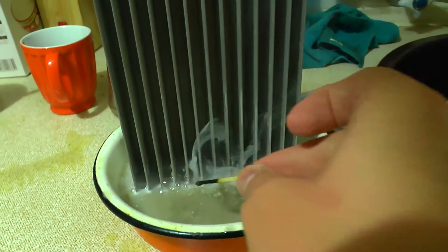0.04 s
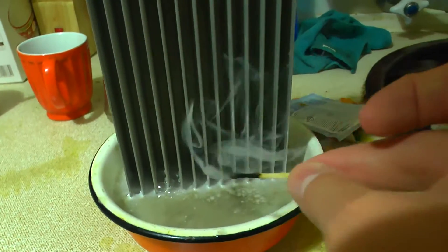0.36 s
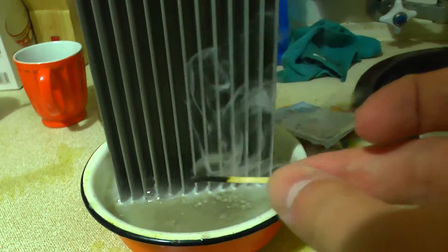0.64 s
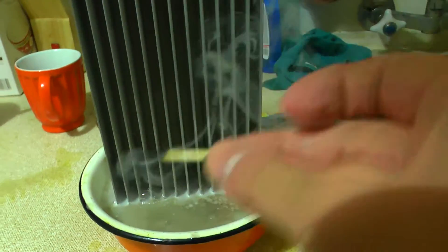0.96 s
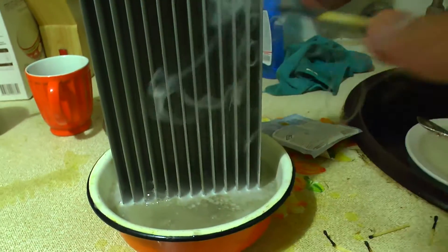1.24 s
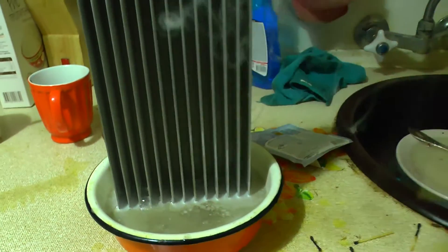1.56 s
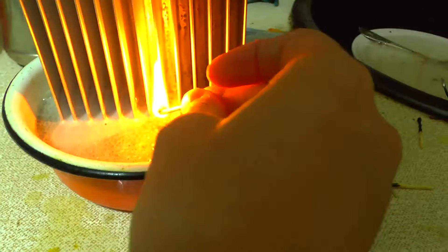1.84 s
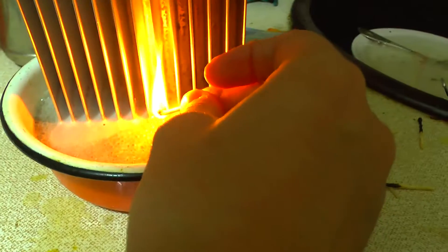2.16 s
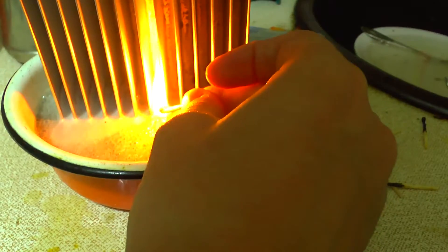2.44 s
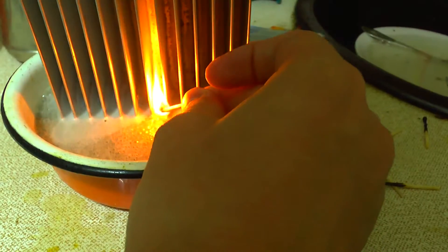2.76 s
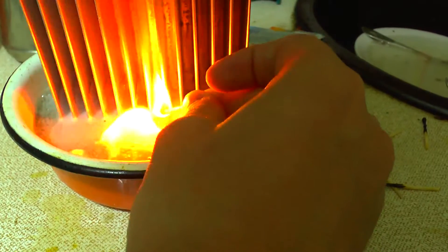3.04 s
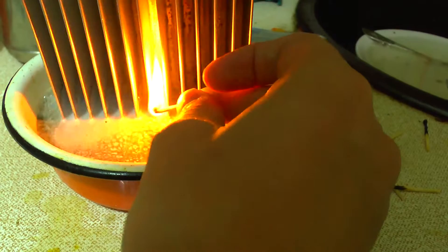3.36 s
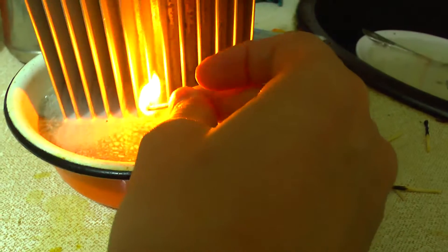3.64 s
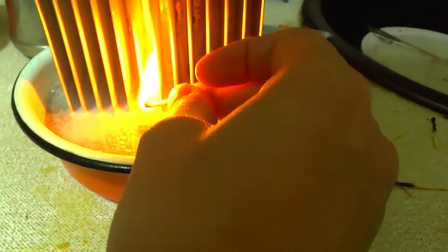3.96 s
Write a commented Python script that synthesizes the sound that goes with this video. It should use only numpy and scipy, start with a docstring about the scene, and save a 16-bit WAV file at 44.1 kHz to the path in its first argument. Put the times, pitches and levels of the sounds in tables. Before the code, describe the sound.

Liquid fizzes steadily in a bowl, then gas bubbles ignite with low pops and a whoosh.

```python
"""A fine, bright fizz comes first: tiny gas bubbles burst in liquid around a finned metal plate in an
enamel bowl, over a faint room hum. The scene then cuts to a later, coarser foam with a flame held to it.
Gas bubbles catch fire with low pops, and a patch of foam flares with a whoosh.
An automatic gain control turns everything down at these loud moments, and the fizz slowly comes back."""
import sys
import numpy as np
from scipy import signal
from scipy.fft import rfft, irfft
from scipy.io import wavfile
from scipy.ndimage import uniform_filter1d

SR = 44100
rng = np.random.default_rng(int(sys.argv[2]) if len(sys.argv) > 2 else 0)


def pcm_store(signal):
    """Save signal as 16-bit PCM."""
    levels = np.round(np.clip(np.atleast_2d(signal), -1, 1) * 32767)
    wavfile.write(sys.argv[1], SR, levels.astype(np.int16).T)


N = 176400  # 4 seconds

# Tone of the room's rumble before and after the cut: f/Hz, relative level/dB
EARLY_RUMBLE = [(20, -26), (45, -11.5), (100, 0), (150, -3), (220, 2), (310, 3.5), (350, -5), (420, -3),
                (520, -2), (650, -12.5), (1000, -18.5), (2000, -52)]
LATE_RUMBLE = [(20, 0.5), (35, 3), (50, -3), (110, 1), (160, 0.5), (230, -1), (290, -3), (480, -3),
               (700, -4.5), (1000, -3), (2000, -52)]
# Steady tones of a humming appliance: f/Hz, level/dB
EARLY_HUM = [(102.3, -74.5), (193.8, -66.5), (290.7, -64.5), (387.6, -62)]
LATE_HUM = [(64.6, -70.5), (193.8, -62.5)]
# Time the room's echo takes to fade by 60 dB: f/Hz, t/s
ECHO_FADE_TIMES = [(100, 0.65), (400, 0.41), (1500, 0.54), (8000, 0.23)]

# Tone of the fine and the coarse fizz: f/Hz, relative level/dB
FINE_TONE = [(410, -52), (700, -22), (862, -26), (907, -21), (1020, -25.5), (1240, -18.5), (1630, -23.5),
             (1760, -18.5), (2080, -17), (2280, -10), (2530, -9.5), (3190, -9.5), (4140, -9), (4540, -6.5),
             (5300, -8.5), (5650, -9), (7820, -5.5), (9140, -4.5), (9750, -5), (12300, -13.5), (15600, -24)]
COARSE_TONE = [(410, -32), (700, -21), (850, -22.5), (1020, -15.5), (1200, -4.5), (1650, -4.5),
               (2080, -6.5), (2250, -2.5), (2900, -3), (3700, -2), (4350, -.5), (4920, -3), (6300, -12),
               (8060, -22.5), (8900, -35.5), (10200, -36.5), (10800, -80), (14000, -77), (22000, -110)]
# Pitches that bowl and plate strengthen or weaken: f/Hz, width/Hz, boost/dB
FINE_RESONANCES = [(2140, 90, -2.5), (2557, 62, 3), (3230, 150, 1), (3620, 110, -2), (3820, 70, 2),
                   (4050, 50, 5), (4180, 130, -4.5), (4560, 200, 1.5), (5380, 110, 3.5), (5800, 130, -1.5),
                   (6030, 130, 1)]
COARSE_RESONANCES = [(1160, 33, 2), (1288, 46, 3), (1480, 60, 2.5), (1680, 32, 3), (1980, 50, 2),
                     (2090, 77, -0.5), (2270, 120, 2.5), (2520, 100, -2.5), (2680, 90, 1.5),
                     (2870, 100, -3), (3100, 90, 2), (3970, 84, 1.5), (4400, 110, 2), (4770, 130, 1)]
# Loudness of the fizz over time: t/s, level/dB
FINE_LOUDNESS = [(0.0, -36), (0.354, -36), (1.448, -37), (1.784, -37.5), (1.82, -38.5)]
COARSE_LOUDNESS = [(1.84, -35.5), (2.3, -35.5), (2.75, -34.6), (2.95, -35), (3.4, -34), (3.75, -35),
                   (4, -35.5)]
# How alike left and right are: f/Hz, likeness (0 = unrelated, 1 or more = the same)
FINE_LIKENESS = [(800, 0), (1250, 0.8), (1700, 0.57), (2600, 0.92), (3600, 0.83), (7000, 2), (10000, 0.75),
                 (15000, .5)]
COARSE_LIKENESS = [(800, 0.88), (1400, 0.92), (2800, 1), (4500, 0.99), (6500, 0.66), (9000, 0.1)]
FLAME_LIKENESS = [(100, 1), (600, 0.98), (1100, 0.88), (1800, 0.94), (2700, 1), (5000, 1), (8000, .6)]
# How far the fizz leans to the left: f/Hz, left minus right level/dB
FINE_LEAN = [(60, -1.5), (150, 0.0), (380, 0.0), (950, -0.61), (2380, 0.0), (5980, 0.0), (15000, 1.3)]
COARSE_LEAN = [(60, 0.0), (150, 0.0), (380, 0.5), (950, 2.5), (2380, 0.04), (5980, 3.1), (15000, 0.22)]

# Bubbles catching fire: t/s, level/dB, f/Hz, snap level relative to the pop/dB
BURNING_BUBBLES = [(2.1775, -13, 402, -12), (2.444, -32.5, 400, -15), (2.648, -40.5, 380, -15),
                   (2.731, -43, 560, -18), (2.826, -40.5, 480, -16), (2.9553, -8, 456, -15.5),
                   (3.0898, -6, 440, -19), (3.1246, -5, 444, -14), (3.2265, -14, 480, -24)]
# Course of the flare: t/s, roar level/dB, rush level/dB, middle of the rush f/Hz
FLARE_COURSE = [(2.955, -58, -62, 2500), (2.968, -23.5, -52, 2500), (2.985, -35, -51, 2500),
                (3.004, -23.5, -47, 2600), (3.016, -21.5, -30, 2650), (3.036, -17, -25, 2600),
                (3.066, -18, -28.5, 1900), (3.09, -15.5, -20.5, 1500), (3.113, -23.5, -39, 1500),
                (3.14, -26, -33, 1500), (3.178, -41.5, -43, 1400), (3.205, -24.5, -36.5, 1400),
                (3.23, -27, -32, 1300), (3.25, -50, -46, 1300), (3.3, -68, -83, 1300)]
# Tone of the swirling flame: f/Hz, relative level/dB
ROAR_TONE = [(20, -21), (50, -12), (75, -10), (130, -1), (210, -3), (300, -0.5), (480, 3), (700, -1.5),
             (1000, -9), (1600, -12.5), (3000, -16), (5500, -22.5), (8000, -41), (10000, -78), (12000, -85)]


def amp(db):
    """Turns decibels into a number to multiply a sound by."""
    return 10 ** (np.asarray(db) / 20)


def unit(x):
    """Scales a signal to an average strength (rms) of 1."""
    return x / np.sqrt(np.mean(x ** 2) + 1e-20)


def at_pitch(table, hz):
    """Looks up a table between its rows, on a logarithmic frequency scale."""
    f, value = np.transpose(table)
    return np.interp(np.log(hz + 1), np.log(f + 1), value)


def over_time(table):
    """Turns each value column of a time table into one value per sample."""
    times, *columns = np.transpose(table)
    return [np.interp(np.arange(N) / SR, times, column) for column in columns]


def frequencies():
    """Lists the frequencies in the spectrum of a full-length sound."""
    return np.fft.rfftfreq(N, 1 / SR)


def shape_stereo(pair, tone_db, likeness):
    """Blends two unrelated signals into stereo of strength 1, with this tone and left-right likeness."""
    middle, side = rfft(pair)
    likeness = np.clip(likeness, 0, 1)
    side = side * np.sqrt((1 - likeness) / (1 + likeness))
    return unit(irfft(np.array([middle + side, middle - side]) * amp(tone_db), N))


def room_hum(tone, rumble_db, hum_tones, likeness):
    """The room rumbles softly while an appliance hums on a few steady pitches."""
    t = np.arange(N) / SR
    hum = sum(amp(db) * np.sqrt(2) * np.sin(2 * np.pi * (hz * t + rng.random())) for hz, db in hum_tones)
    rumble = shape_stereo(rng.standard_normal((2, N)), at_pitch(tone, frequencies()), likeness)
    return amp(rumble_db) * rumble + hum


def room_echo(sound, likeness):
    """Sound bounces around a small kitchen, and each pitch dies away at its own speed."""
    middle, side = rng.standard_normal((2, SR // 2))
    side = side * np.sqrt((1 - likeness) / 2)
    hz, t, bands = signal.stft([middle + side, middle - side], SR, nperseg=256)
    fading = amp(-60 * t / at_pitch(ECHO_FADE_TIMES, hz)[:, None])
    tail = signal.istft(bands * fading, SR, nperseg=256)[1]
    tail *= np.minimum(np.arange(tail.shape[1]) / SR / 0.012, 1)  # builds up over 12 ms
    return signal.fftconvolve(sound, tail / np.linalg.norm(tail[0]), axes=1)[:, :N]


def fizz(tone, resonances, likeness, lean, bubbles_per_s, spread_db, flutter_db, flutter_s):
    """Tiny bubbles burst in loose clusters, each a click coloured by the foam, bowl and plate."""
    hz = frequencies()
    clicks = (rng.random((2, N)) < bubbles_per_s / SR) * rng.choice([-1., 1.], (2, N))
    sizes = amp(spread_db * np.minimum(rng.exponential(1, (2, N)), 6))
    clusters = unit(uniform_filter1d(rng.standard_normal(N), round(flutter_s * SR)))
    bursts = clicks * sizes * amp(flutter_db * clusters)
    octaves_below = np.maximum(np.log2(tone[0][0] / (hz + 1)), 0)  # under the table's lowest pitch
    ringing_db = sum(db / (1 + (2 * (hz - f) / width) ** 2) for f, width, db in resonances)
    tone_db = at_pitch(tone, hz) - 24 * octaves_below + ringing_db
    stereo = shape_stereo(bursts, tone_db, at_pitch(likeness, hz))
    lean_db = np.outer([.5, -.5], at_pitch(lean, hz))
    return irfft(rfft(stereo) * amp(lean_db), N)


def gas_pops():
    """Each gas bubble burns in one short swing that falls in pitch, with a sharp snap and a low thump."""
    swell_s, pitch_drop_s = 0.0016, 0.00067
    snap_at_s, snap_width_s, snap_band_hz = 0.0011, 0.0006, [1100, 3600]
    thump_hz, thump_db, thump_fade_s = 171, -15.5, 0.0044
    track, t = np.zeros(N), np.arange(0, .03, 1 / SR)
    swell = (t / swell_s * np.exp(1 - t / swell_s)) ** 2
    snap_filter = signal.butter(2, snap_band_hz, "band", fs=SR)
    snap_shape = np.exp(-((t - snap_at_s) / snap_width_s) ** 2)
    thump = amp(thump_db) * np.sin(2 * np.pi * thump_hz * t) * np.exp(-t / thump_fade_s)
    for start_s, db, hz, snap_db in BURNING_BUBBLES:
        pitch_hz = hz * (1 + 0.72 * np.exp(-t / pitch_drop_s))  # starts 72% high
        swing = -swell * np.sin(2 * np.pi * np.cumsum(pitch_hz) / SR)
        snap_noise = unit(signal.lfilter(*snap_filter, rng.standard_normal(len(t))))
        snap = amp(snap_db) * snap_shape * snap_noise
        start = round(start_s * SR)
        track[start:start + len(t)] += amp(db) * (swing + thump + snap)
    return signal.sosfilt(signal.butter(3, [75, 6000], "band", fs=SR, output="sos"), track)


def foam_flare():
    """Flame races over the foam: a swirling roar, and a rush that falls in pitch as the flame spreads."""
    rush_width_hz = 530
    roar_db, rush_db, middle_hz = over_time(FLARE_COURSE)
    hz, t = frequencies(), np.arange(N) / SR
    likeness = at_pitch(FLAME_LIKENESS, hz)
    roar = shape_stereo(rng.standard_normal((2, N)), at_pitch(ROAR_TONE, hz), likeness)
    # The rush is low noise shifted up to sit around a sliding pitch.
    low_pass = signal.butter(2, rush_width_hz / 2, fs=SR, output="sos")
    low_noise = signal.sosfilt(low_pass, rng.standard_normal((2, 2, N)))
    phase = 2 * np.pi * np.cumsum(middle_hz) / SR
    shifted = low_noise[0] * np.cos(phase) - low_noise[1] * np.sin(phase)
    rush = shape_stereo(shifted, 0, likeness)
    burning = (t > FLARE_COURSE[0][0]) & (t < FLARE_COURSE[-1][0])
    return (roar * amp(roar_db) + rush * amp(rush_db)) * burning


def scene():
    """Fine fizz plays up to the cut, then coarse fizz and burning gas, all over the room's hum."""
    cut_s, fade_s, echo_db = 1.839, 0.0049, -14.5
    fine = fizz(FINE_TONE, FINE_RESONANCES, FINE_LIKENESS, FINE_LEAN,
                bubbles_per_s=16000, spread_db=2.0, flutter_db=0.36, flutter_s=0.012)
    coarse = fizz(COARSE_TONE, COARSE_RESONANCES, COARSE_LIKENESS, COARSE_LEAN,
                  bubbles_per_s=9000, spread_db=1.0, flutter_db=0.15, flutter_s=0.013)
    early = room_hum(EARLY_RUMBLE, rumble_db=-55.5, hum_tones=EARLY_HUM, likeness=0.74)
    late = room_hum(LATE_RUMBLE, rumble_db=-56.5, hum_tones=LATE_HUM, likeness=0.54)
    early += fine * amp(over_time(FINE_LOUDNESS)[0])
    late += coarse * amp(over_time(COARSE_LOUDNESS)[0])
    fire = (gas_pops() + foam_flare()) * amp([[.6], [-.6]])  # slightly to the left
    fade = (np.arange(N) / SR - cut_s) / fade_s  # passes through silence at the cut
    fizz_and_hum = early * np.clip(-fade, 0, 1) + late * np.clip(fade, 0, 1)
    return fizz_and_hum + fire + amp(echo_db) * room_echo(fire, likeness=0.85)


def record(dry):
    """Gain control turns loud moments down and recovers slowly; a filter removes the highest treble."""
    limit_db, share_removed, sense_s, recover_db_per_s = -28, 0.59, 0.026, 12.5
    memory = np.exp(-1 / (sense_s * SR))
    power = signal.lfilter([1 - memory], [1, -memory], (dry ** 2).mean(0))
    too_loud_db = np.maximum(10 * np.log10(power + 1e-12) - limit_db, 0)
    recovery_db = np.arange(N) * recover_db_per_s / SR
    # The volume drops quickly, then climbs back at a steady rate.
    drop_db = np.maximum.accumulate(share_removed * too_loud_db + recovery_db) - recovery_db
    treble_cut = signal.firwin(511, cutoff=15750, window=("kaiser", 9), fs=SR)
    return signal.oaconvolve(dry * amp(-drop_db), treble_cut[None], "same")


dry = scene()
out = record(dry)
pcm_store(out)
```